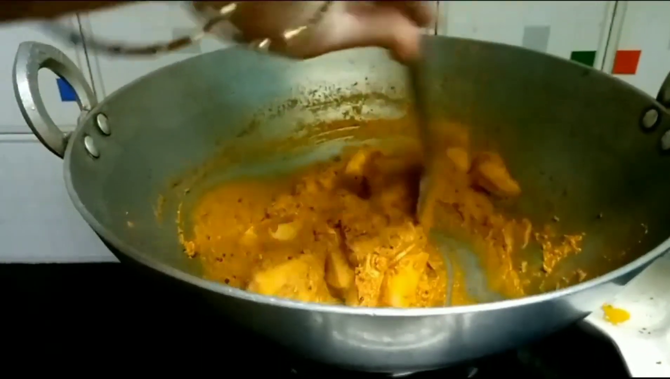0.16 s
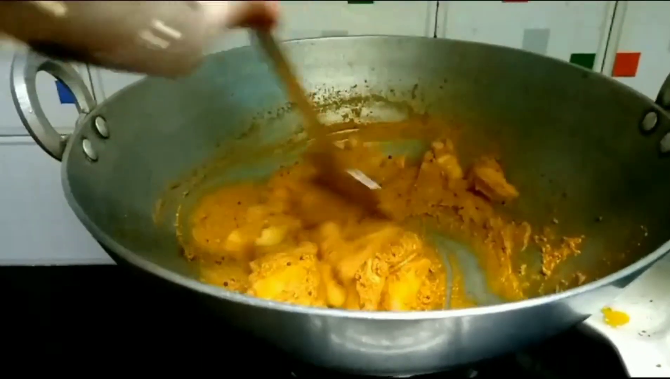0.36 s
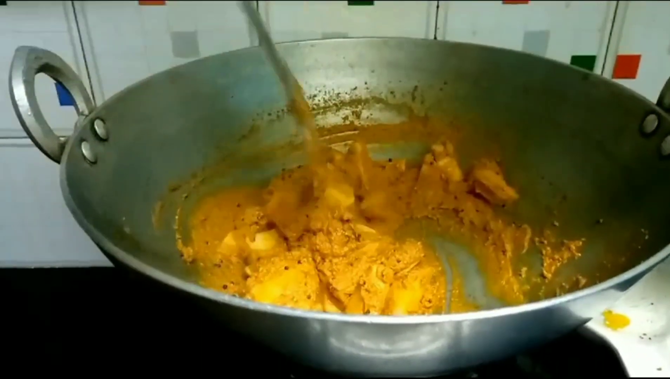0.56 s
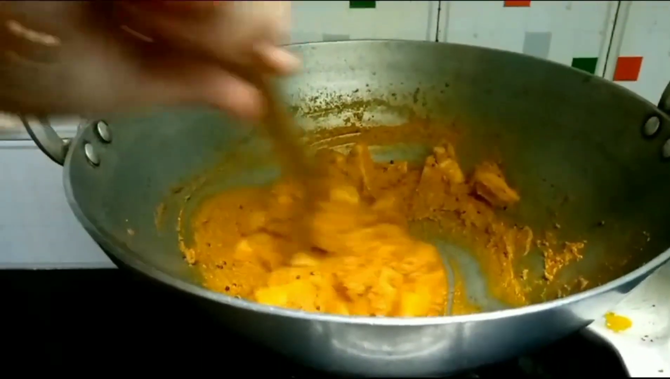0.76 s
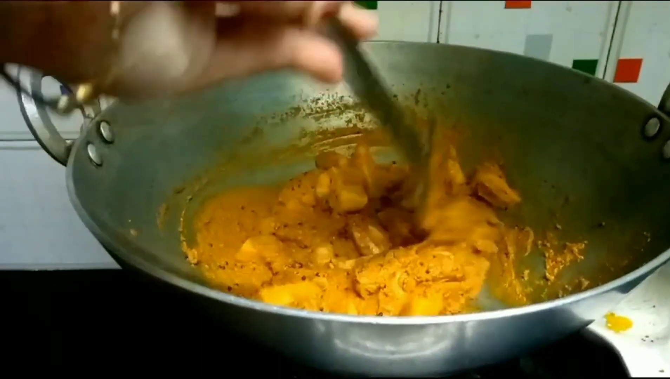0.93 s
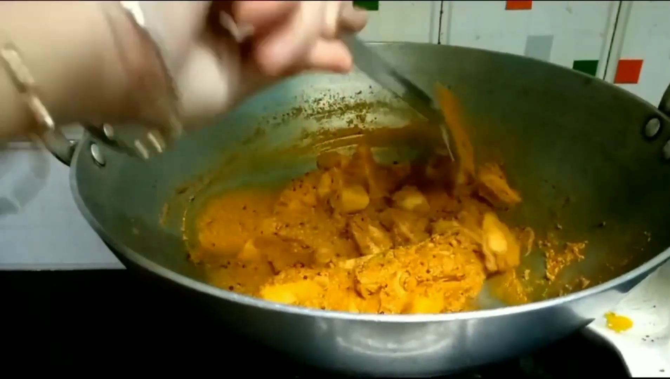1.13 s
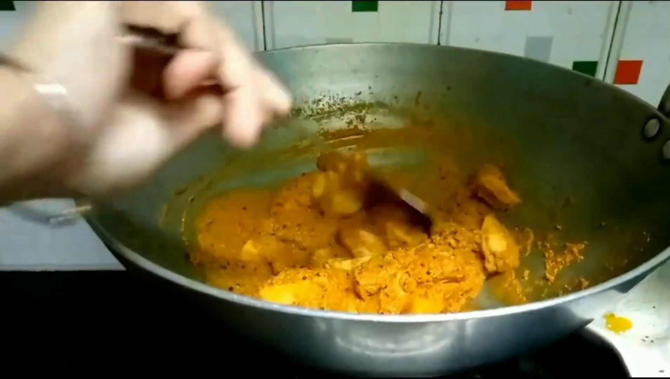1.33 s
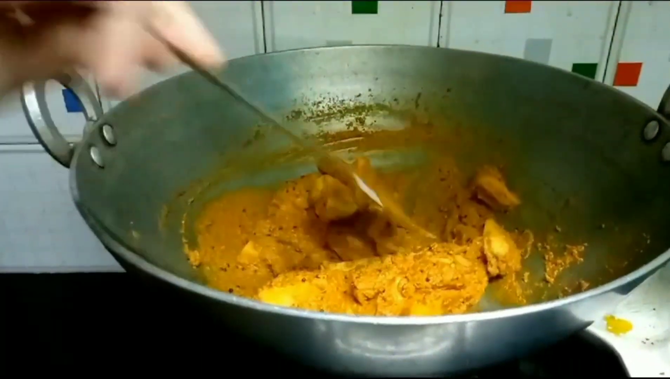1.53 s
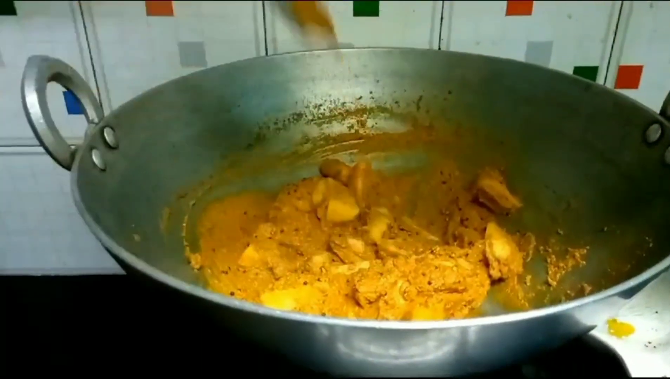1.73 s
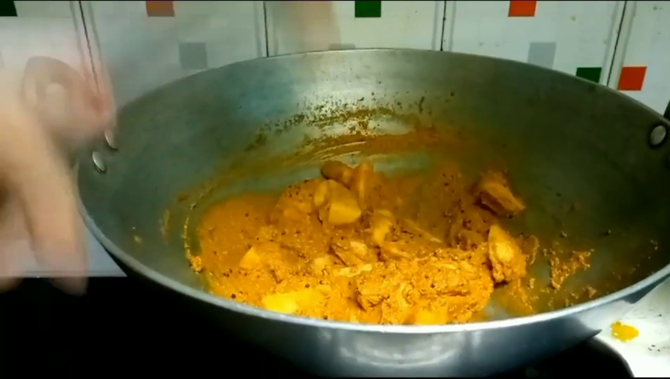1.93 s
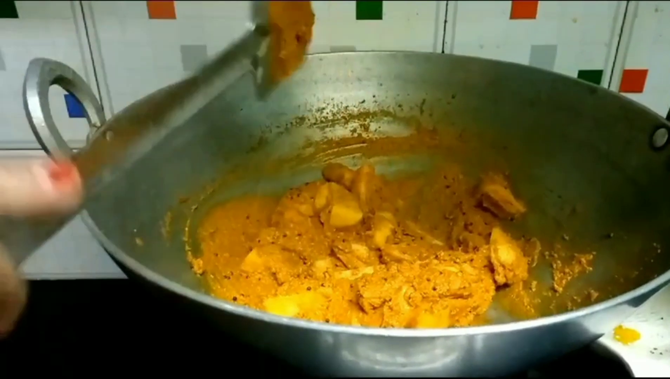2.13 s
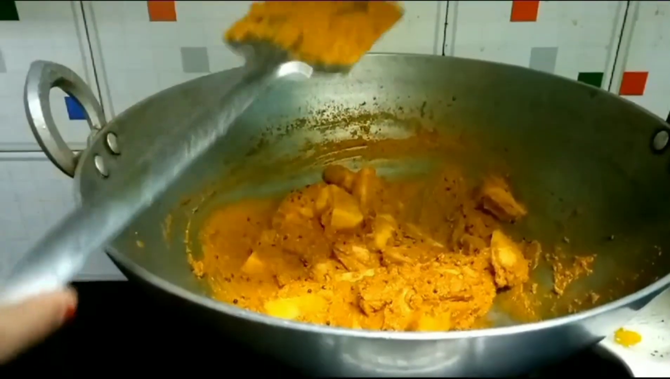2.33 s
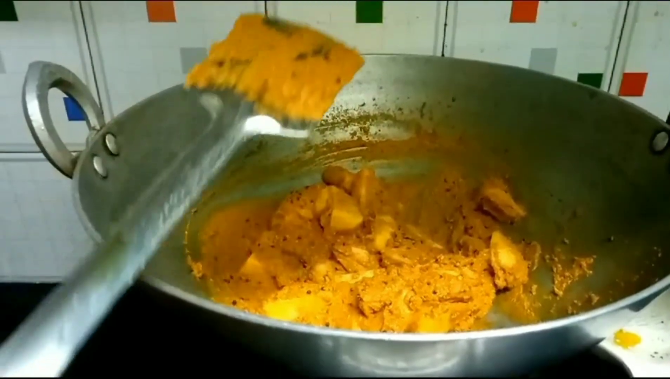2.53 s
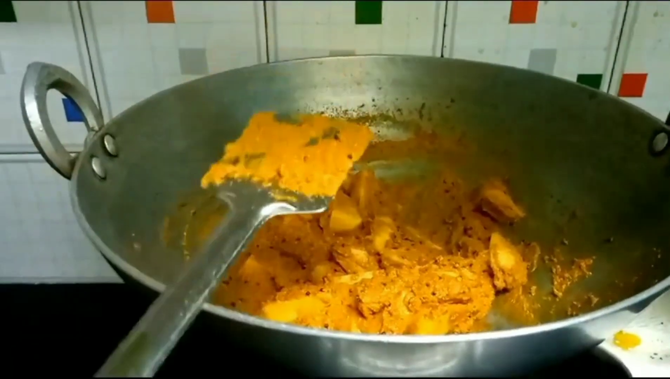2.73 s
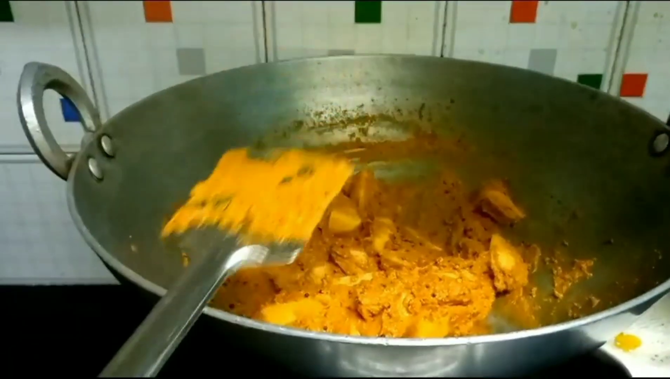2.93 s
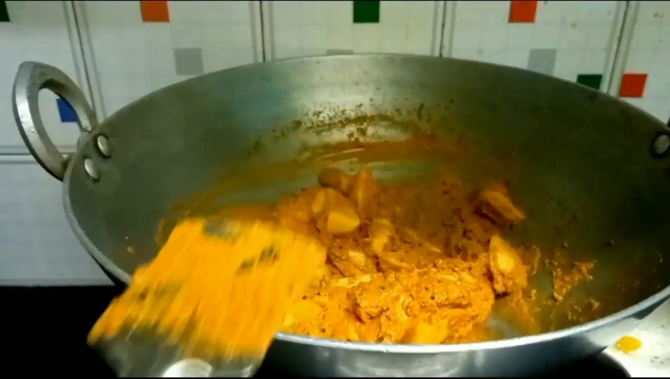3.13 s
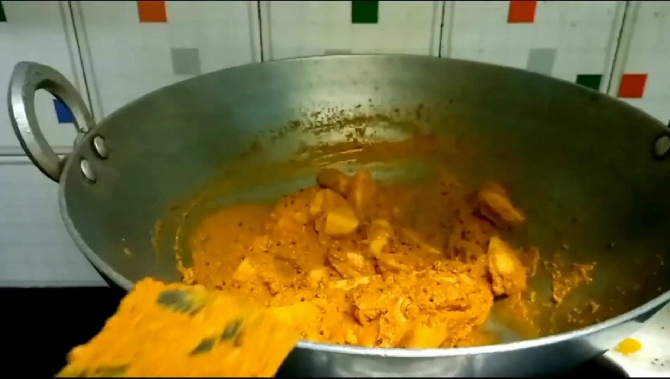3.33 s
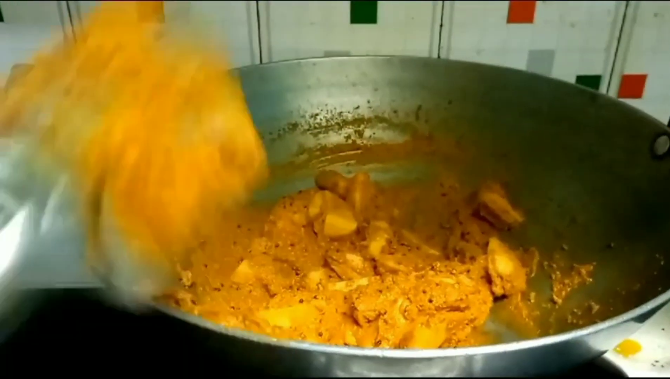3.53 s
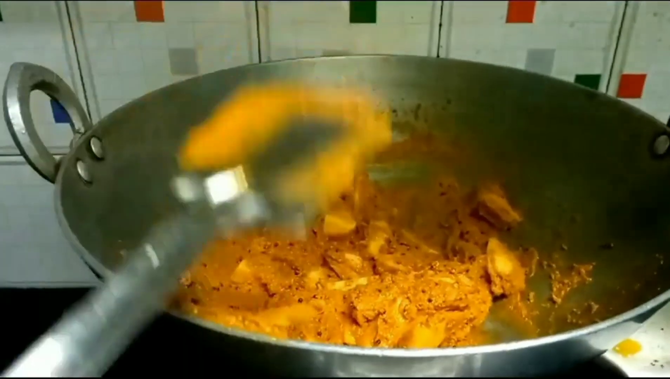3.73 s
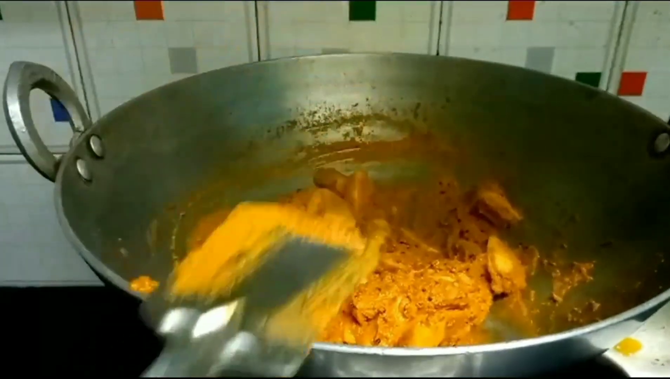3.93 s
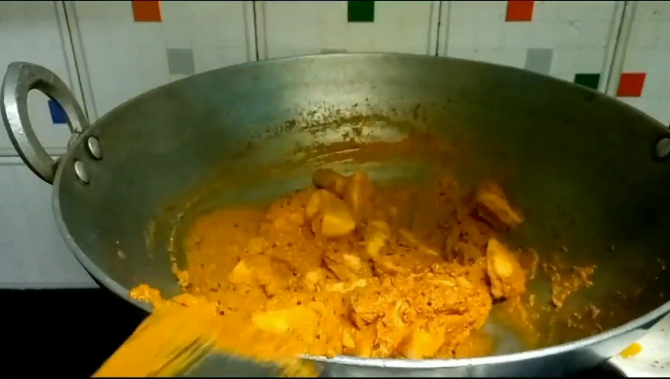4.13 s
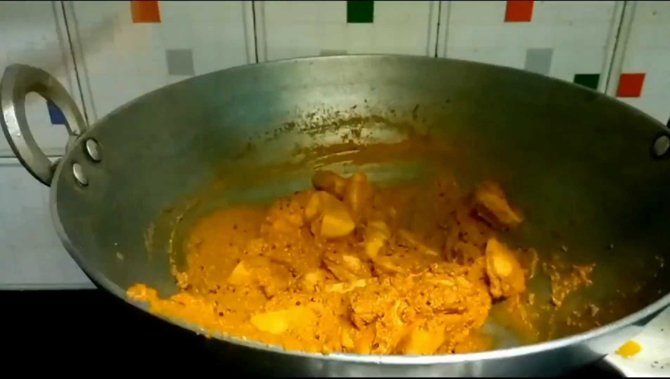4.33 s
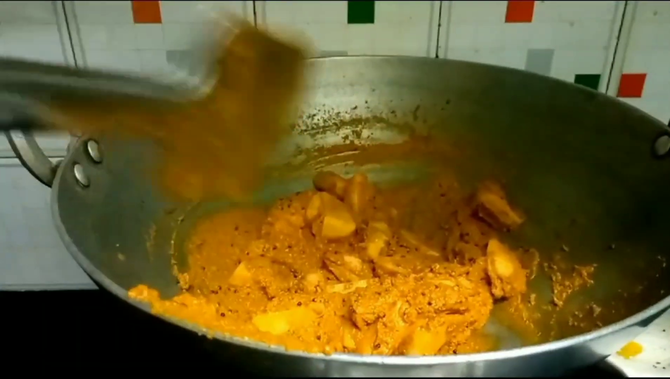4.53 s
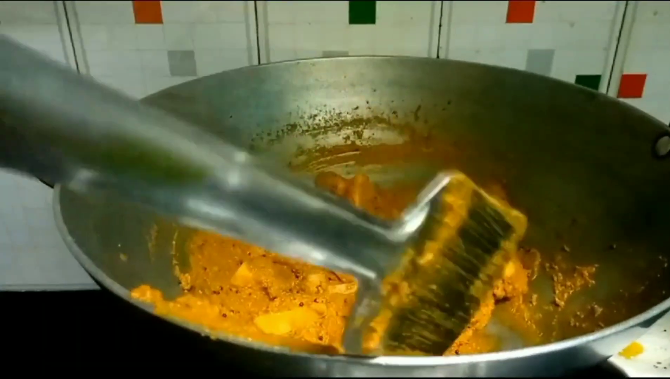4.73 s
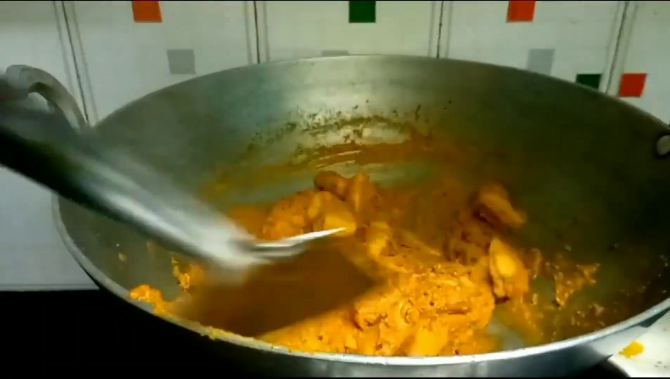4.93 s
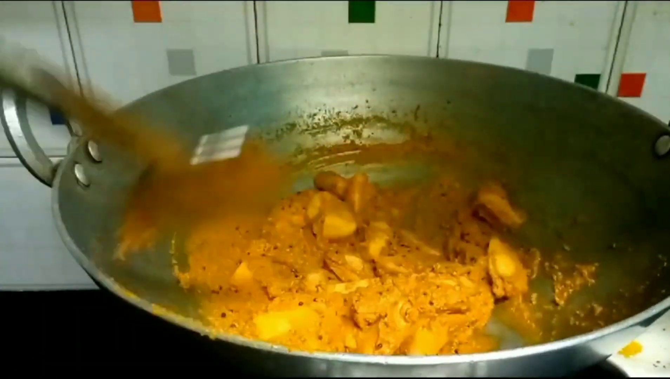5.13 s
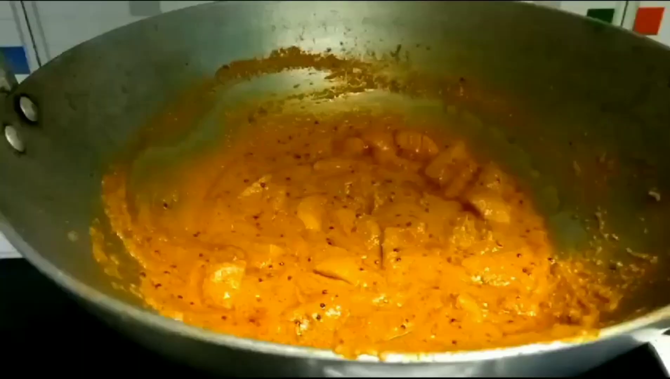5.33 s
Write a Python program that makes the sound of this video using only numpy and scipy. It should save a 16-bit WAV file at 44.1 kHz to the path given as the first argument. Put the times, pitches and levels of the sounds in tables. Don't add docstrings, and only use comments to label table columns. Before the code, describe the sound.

A small, hard-surfaced kitchen heard closely in stereo, with a soft low burner drone and bassy moving air throughout. From 0 to 0.3 s a metal spatula scrapes and shoves thick paste, with several dull, damped pan knocks. A muted scrape comes near 0.8 s; otherwise, until about 2.2 s, there are only sparse bangle ticks and tiny wet pops. Light metallic taps start at 2.7 s, clustering with short ringing scrapes around 2.9-3.1 s. Soft thuds and lumpy pushes follow at 3.2-3.45 s, then a bright bangle jingle at 3.5 s. At 3.86 s a hard double blow on the rim clanks loudest, with a short ring. Faint taps and muffled shoves occupy 4.1-4.4 s. Another hard clank at 4.7 s leads into a rough, bright, stuttering scrape, strongest at 4.85-5.0 s. At 5.25 s the sound briefly hushes, then faint, crisp frying hiss continues to the end.

```python
import sys
import numpy as np
from scipy import signal
from scipy.fft import rfft, irfft, next_fast_len
from scipy.io import wavfile
from scipy.ndimage import uniform_filter1d

SR = 44100
rng = np.random.default_rng(int(sys.argv[2]) if len(sys.argv) > 2 else 0)


def gain_from_db(level_db):
    decades = np.asarray(level_db, float) / 20
    return 10 ** decades


def master_out(mix):
    frames = np.transpose(np.atleast_2d(mix))
    ceiling = np.clip(frames, -1, 1)
    pcm = np.round(ceiling * 32767).astype(np.int16)
    wavfile.write(sys.argv[1], SR, pcm)


N = 241315
T = np.arange(N) / SR
HUSH_FROM_S, HUSH_TO_S = 5.252, 5.301


def unit(x):
    return x / np.sqrt(np.mean(x ** 2))


def decay(t, t60_s):
    return 1000 ** (-t / t60_s)


def colour(x, table, share=1):
    size = next_fast_len(x.shape[-1])
    hz, db = np.transpose(table)
    log_hz = np.log(np.arange(size // 2 + 1) * SR / size + 1)
    gain = gain_from_db(share * np.interp(log_hz, np.log(hz), db))
    return irfft(rfft(x, size) * gain, size)[..., :x.shape[-1]]


def low(x, hz):
    return signal.sosfilt(signal.butter(2, hz, fs=SR, output="sos"), x)


def high(x, hz):
    return signal.sosfilt(signal.butter(2, hz, "high", fs=SR, output="sos"), x)


def brighten(x, hz, db):
    top = high(x, hz)
    return x - top + gain_from_db(db) * top


def tone(x, body_db, bright_db):
    return brighten(brighten(x * gain_from_db(body_db), 1600, -body_db), 2870, bright_db)


def resonate(x, peaks):
    out = 0
    for hz, width, db in peaks:
        sharpness = hz / max(width, 5, hz / 70)
        out = out + gain_from_db(db) * signal.lfilter(*signal.iirpeak(hz, sharpness, SR), x)
    return out


def walk(rate):
    return 1.2 * np.interp(T * rate, np.arange(N // 100), rng.standard_normal(N // 100))


def add(out, s, x, db):
    i = int(s * SR)
    out[..., i:i + x.shape[-1]] += gain_from_db(db) * x / np.abs(x).max()


def grit(scatter_db, flutter_db, rate):
    size_db = scatter_db * rng.exponential(size=N) + flutter_db * walk(rate)
    return unit(rng.standard_normal((2, N)) * gain_from_db(size_db))


def strokes(rows, dulling):
    s, db, swell, fade, bright_db = np.transpose(rows)
    pair = np.clip(np.searchsorted(s, T) - np.array([[1], [0]]), 0, len(s) - 1)
    eased_db = 20 * np.maximum((s[pair] - T) / swell[pair], (T - s[pair]) / fade[pair])
    level_db = db[pair] - eased_db
    firmer = np.argmax(level_db, axis=0), np.arange(N)
    bright_db = np.maximum(bright_db[pair] - dulling * eased_db, -30)
    return uniform_filter1d(gain_from_db(level_db)[firmer], size=400), uniform_filter1d(bright_db[firmer], size=400)


# (frequency [Hz], side minus mid [dB])
SIDE_SHARE = [(60, -29), (110, -17), (200, -15.5), (380, -10.5), (700, -4), (1290, 1.5), (2380, 0.5),
              (4400, 0.5), (8120, 0), (15000, -0.5)]


def ports(mid, side):
    side = colour(side, SIDE_SHARE)
    return np.array([mid + side, mid - side])


# (frequency [Hz], width [Hz], level [dB])
DRONE_LINES = [(43.5, 7.4, -9), (100.8, 7, 1), (147.4, 7.8, -10.5), (288.7, 16, -7)]
# (time [s], drone level [dB])
FLAME = [(0.0, -45), (0.32, -57), (0.41, -43), (0.6, -48), (0.8, -54), (1.31, -48), (2.19, -50.5),
         (2.3, -42), (2.42, -47), (2.85, -39), (3.03, -44), (3.7, -42), (3.9, -45), (4.59, -44),
         (4.68, -50), (4.77, -42), (5.21, -44), (5.47, -44)]


def burner():
    hum = rng.standard_normal((2, N))
    drone = 0
    for hz, width, db in DRONE_LINES:
        line = resonate(resonate(hum, [(hz, width, 0)]), [(hz, 2 * width, 0)])
        drone = drone + gain_from_db(db) * unit(line)
    return drone * gain_from_db(np.interp(T, *np.transpose(FLAME)) - 2.2)


# (frequency [Hz], density [dB per Hz])
AIR_COLOUR = [(15, -33.5), (30, -14.5), (60, -10), (130, -4), (220, -10), (420, -10), (600, -18),
              (1100, -26), (1480, -29.5), (2050, -28), (3920, -41), (11900, -46.5), (16000, -55.5)]
# (time [s], level [dB])
FAN = [
    (0.0, -41),
    (0.4, -47.5),
    (1.5, -49),
    (2.4, -48),
    (3.1, -43.5),
    (4.2, -44.5),
    (4.68, -46),
    (4.78, -40),
    (5.2, -48),
    (5.47, -48),
]


def fan():
    draught = unit(colour(rng.standard_normal((2, N)), AIR_COLOUR))
    return draught * gain_from_db(np.interp(T, *np.transpose(FAN)) + .8 * walk(6))


# (frequency [Hz], density [dB per Hz])
DRAG_COLOUR = [(180, -39), (300, -11.5), (842, -12), (1250, -7.5), (1530, -13.5), (2700, -13),
               (3520, -11.5), (8640, -22), (14000, -26), (15200, -37), (16000, -84)]
# (time [s], level [dB], time to fade 20 dB [s], ring [Hz], ring level [dB])
SNAGS = [(0.005, -46, .04, 4000, 8), (0.06, -50, .03, 4500, 10), (2.9387, -50, .12, 2780, 18),
         (2.95, -54, .05, 3500, 17), (2.93, -54, .06, 4850, 14), (3.012, -42, .05, 2480, 15),
         (3.028, -42, .09, 770, 27), (3.069, -38, .04, 2230, 12), (3.095, -50, .1, 3100, 18),
         (4.7877, -38, .05, 2660, 8), (4.8156, -31, .04, 5020, 7), (4.862, -34, .12, 1240, 14),
         (4.8815, -25.5, .022, 5100, 5), (4.9, -32, .04, 2130, 10), (4.914, -25.5, .02, 1400, 8),
         (4.9328, -25, .03, 2780, 7), (4.9598, -23, .022, 8500, 0), (4.964, -33, .06, 2130, 14),
         (4.983, -24.5, .02, 2700, 6), (4.962, -33, .03, 4250, 13), (5.066, -47, .03, 2750, 16)]


def snags(rough):
    rise_s, sharpness = .0015, 24
    out, t = np.zeros((2, N)), T[:SR // 4]
    for s, db, fade, hz, ring_db in SNAGS:
        i = int(s * SR)
        burst = rough[:, i:i + len(t)] * gain_from_db(db - 20 * t / fade) * np.minimum(t / rise_s, 1)
        scratch = gain_from_db(12.5) * high(colour(burst, DRAG_COLOUR), 1000)
        ring = resonate(burst[0], [(hz, hz / sharpness, ring_db + 6)])
        out[:, i:i + len(t)] += scratch + ring
    return out


# (firmest pressure at [s], level [dB], time to swell 20 dB [s], time to fade 20 dB [s], brightness [dB])
DRAGS = [(0.02, -33.5, .3, .15, 2), (0.14, -48, .03, .01, 6), (0.74, -50, .04, .2, 3),
         (0.78, -38.5, .06, .06, -12), (0.85, -57, .06, .1, 2), (2.285, -51, .05, .13, 5),
         (2.862, -38, .004, .06, 0), (2.95, -41, .1, .1, -4), (3.0, -39, .2, .05, -7),
         (3.028, -31, .04, .3, -5.5), (3.072, -30, .3, .058, -10), (3.2, -44, .11, .03, -11),
         (3.37, -52, .08, .035, 0), (4.084, -41, .012, .045, 6), (4.735, -34, .01, .3, -5),
         (4.89, -28, .24, .3, -3), (4.96, -28, .6, .3, -3), (4.995, -26, .2, .05, -5)]
# (frequency [Hz], width [Hz], level [dB])
OPENING = [(2490, 42, -5), (4110, 130, 0), (4470, 41, 0), (5510, 54, -4), (5840, 31, -5), (8000, 110, -9),
           (8560, 40, -8), (10400, 35, -12), (11700, 44, -12)]
# (frequency [Hz], width [Hz], level [dB])
LIGHT = [(759, 31, 1), (1420, 25, -13), (1914, 51, 3), (2260, 22, 1), (2500, 38, -6), (2614, 29, 5),
         (3140, 24, -3.5), (2780, 35, -3), (3500, 45, -8), (4100, 55, -8), (4550, 60, -8), (5450, 70, -10)]
# (frequency [Hz], width [Hz], level [dB])
FIRM = [(1263, 59, -3.5), (1394, 16, 2), (1700, 78, -5.5), (2130, 40, 3.5), (2720, 110, 4), (3310, 41, -14),
        (4180, 104, -1), (4580, 67, -2.5), (5120, 60, -5), (5580, 74, -15), (754, 35, -18), (6330, 60, -14),
        (7880, 80, -12), (8580, 150, -12), (11200, 200, -14)]


def drags():
    bare_until_s, light_from_s, firm_from_s = .3, 2.5, 4.5
    full_body_at_db, thin_body_db, full_body_db, firm_body_db = -30, -4, 3, 1
    gain, bright_db = strokes(DRAGS, .3)
    eased_db = np.maximum(full_body_at_db - 20 * np.log10(np.abs(gain) + 1e-9), 0)
    light_body_db = np.maximum(full_body_db - 1.1 * eased_db, thin_body_db)
    body_db = np.where(T > firm_from_s, firm_body_db, light_body_db)
    rough = grit(2.3, .9, 110)
    push = rough * gain
    rub = colour(push, DRAG_COLOUR) * gain_from_db(12.5)
    buried, light, firm = np.split(push[0], [int(light_from_s * SR), int(firm_from_s * SR)])
    bare = buried * (T[:len(buried)] < bare_until_s)
    lines = np.concatenate([gain_from_db(3) * resonate(bare, OPENING),
                            gain_from_db(12) * resonate(light, LIGHT),
                            gain_from_db(9) * resonate(firm, FIRM)])
    return tone(rub + lines, body_db, bright_db + 7) + brighten(snags(rough), 2870, 2.5)


# (frequency [Hz], width [Hz], level [dB])
PAN = [(290.7, 32.4, 5), (432, 170, -13), (540, 40, -9), (802, 47, -12.5), (998, 120, -16), (1186, 64, -23),
       (1552, 60, -11.5), (1950, 150, -25.5), (2530, 300, -19), (3120, 370, -26)]
# (time [s], peak level [dB], brightness above 700 Hz [dB])
KNOCKS = [(0.091, -22.5, -6), (0.152, -18, 12), (0.236, -25.5, 3), (0.287, -28.5, -11.5), (1.293, -46, 27),
          (3.188, -24, -12.5), (3.214, -23.5, -8), (3.263, -29, -1), (3.382, -39, -8.5), (3.408, -22, 7.5),
          (3.432, -36, 1.5), (4.196, -24.5, -23), (4.236, -23, 4.5), (4.254, -40, -4.5), (4.341, -27, 4),
          (4.367, -21, 3)]


def knocks():
    out, t = np.zeros(N), T[:SR // 4]
    for s, peak_db, bright_db in KNOCKS:
        rattle = rng.standard_normal(len(t)) * np.exp(-t / 0.0048)
        blow = t / .0001 * np.exp(-t / .0001) + .2 * rattle
        ring = low(resonate(blow, PAN), 2600) + gain_from_db(-47) * low(rattle, 5000)
        add(out, s - .001, brighten(ring, 760, bright_db), peak_db + 1.0)
    return out


# (time [s], peak level [dB], pitch [Hz])
FAINT_TICKS = [(0.1231, -43, 8450), (0.1894, -48, 8480), (0.2824, -48, 13500), (0.3915, -51, 12800),
               (0.5294, -60, 8460), (0.5516, -57, 8990), (0.5744, -61, 8550), (0.7382, -46, 8320),
               (0.7801, -44, 12200), (0.8074, -49, 11800), (0.8889, -52, 7990), (0.9524, -58, 8620),
               (1.0365, -57, 12800), (1.061, -56, 9090), (1.1124, -55, 11900), (1.1344, -59, 8460),
               (1.1444, -54, 12300), (1.1644, -59, 8910), (1.2194, -56, 14500), (1.2444, -53, 9030),
               (1.3894, -52, 8490), (1.4194, -55, 11700), (2.378, -54, 13100)]


def faint_ticks():
    out, t = np.zeros((2, N)), T[:SR // 20]
    for s, peak_db, hz in FAINT_TICKS:
        hiss = rng.standard_normal((2, len(t))) * decay(t, .035)
        add(out, s - .001, resonate(hiss, [(hz, 2500, 0), (hz, 500, 3)]), peak_db - 5)
    return out


# (hardest push at [s], level [dB], time to swell 20 dB [s], time to fade 20 dB [s], brightness [dB])
SHOVES = [
    (0.17, -32.5, .17, .075, -3),
    (0.238, -39, .02, .06, 3),
    (3.22, -33.5, .065, .033, -2.5),
    (3.266, -43, .035, .033, -20),
    (3.418, -36.5, .06, .1, 5),
    (3.44, -36, .1, .044, -18),
    (4.202, -40.5, .04, .2, 1.5),
    (4.272, -34, .2, .09, 0),
    (4.392, -37, .4, .04, -5),
]


def shoves():
    gain, bright_db = strokes(SHOVES, .6)
    lumps = grit(2.0, 2.5, 45)[0] * gain
    return brighten(low(resonate(lumps, PAN), 2700) * gain_from_db(21), 700, bright_db + 2.5)


# (time [s], peak level [dB], low ring [Hz], high ring [Hz], high ring level [dB])
JINGLES = [(0.2292, -41.5, 5420, 13400, -13), (0.2664, -47, 4600, 9700, -12),
           (0.454, -45.5, 9000, 10850, -2), (0.7263, -49, 5330, 10200, -2), (0.846, -36.5, 5300, 7000, -8),
           (1.0945, -48, 4900, 8600, -4), (1.2521, -48, 4680, 11500, -14), (1.8846, -43, 5320, 12200, 0),
           (1.9097, -43, 6470, 12200, 4), (2.2834, -37.5, 6270, 11500, 3.5),
           (3.5168, -32.5, 5780, 13030, 9.5), (4.15, -40.5, 7800, 10600, -6), (4.2356, -49, 4800, 9400, 2)]
# (time [s], peak level [dB], low ring [Hz])
TICKS = [(0.325, -53, 4600), (0.415, -55, 8500), (0.7018, -53, 5240), (0.9787, -54, 9430),
         (1.1926, -49.5, 4490), (1.328, -55, 4300), (1.4077, -49, 8900), (1.5279, -53, 8900),
         (1.594, -50.5, 8700), (1.7479, -56, 8440), (1.7848, -51.5, 9000), (2.1196, -53, 5120),
         (2.149, -53.5, 8970), (2.235, -54, 5270), (2.5157, -53, 5760), (2.6294, -59, 4710),
         (3.7594, -58, 4400), (4.427, -53, 9020)]


def bangles():
    out, t = np.zeros((2, N)), T[:SR // 4]
    touches = [(*row, 11500, -4) for row in TICKS]
    for s, peak_db, low_hz, high_hz, high_db in JINGLES + touches:
        hz = np.array([[low_hz], [1.09 * low_hz], [high_hz], [.92 * high_hz]])
        db = np.array([[0], [-4], [high_db], [high_db - 2.5]])
        ring = (gain_from_db(db) * np.sin(2 * np.pi * hz * t)).sum(axis=0) * decay(t, .018)
        noise = rng.standard_normal((2, len(t)))
        rattle = unit(resonate(noise, [(low_hz, 1300, 0), (high_hz, 2600, high_db)]))
        rattle = rattle * decay(t, .047) * np.minimum(t / .002, 1) * gain_from_db(2)
        add(out, s - .001, ring + rattle, peak_db + 1.5)
    return out


# (frequency [Hz], level [dB], t60 [s])
SPATULA = [(378, -25, 0.18), (476.5, -6.5, 0.16), (574, -6, .17), (760, -13, 0.16), (890, -12.5, 0.14),
           (1112, -26, 0.18), (1310, -11, 0.1), (1427, -4.5, 0.1), (1620, -15, 0.13), (1847, -9, 0.23),
           (2120, -15, .14), (2226, -15, 0.11), (2496, -7, 0.15), (2640, 3, 0.1), (2790, -4.5, .14),
           (2900, -6, 0.14), (3142, -5, 0.18), (3290, -2, 0.14), (4460, -7, .1), (4545, 4, 0.06),
           (5100, -21.5, 0.073), (4750, -22.5, .08), (5640, -13, 0.033), (5800, -31, .08),
           (6500, -16, 0.05), (7800, -42, .08), (8800, -11, .08), (8463, 0, .05), (10000, -9, .08),
           (11600, -6, .04)]
# (frequency [Hz], level [dB], t60 [s])
TIP = [(764, -6, 0.2), (1093, -10, 0.12), (1420, -10, 0.2), (1905, -13, 0.15), (2121, -8, 0.2),
       (2245, 0.5, 0.29), (2450, -26, 0.058), (2745, -6, 0.15), (3144, -4.5, 0.28), (3850, -2.5, 0.15),
       (4474, -9, .1), (4900, -35, 0.047), (5469, -8, 0.1), (6550, -35, 0.04), (7800, -24, .06),
       (8900, -4, 0.04)]
# (frequency [Hz], density [dB per Hz])
CRACK = [(180, -50), (300, 0), (1390, -14.5), (1530, -20), (2170, 3), (2360, -7), (2610, 1), (3580, -17.5),
         (4590, -4.5), (5900, -21), (8500, -22), (11500, -32), (16000, -36)]
# (frequency [Hz], level [dB])
NOTCH = [(3300, -0.5), (3650, -6), (4000, 0)]
# (time [s], peak level [dB], brightness above 2.9 kHz [dB], ring length factor, body below 1.6 kHz
# [dB])
CLINKS = [
    (2.7166, -27, 5, .85, 3),
    (2.8633, -31.5, 6, 1, 8),
    (3.0065, -29, -6, 1, 14),
    (3.0255, -21.5, 3.5, 0.85, 0),
    (3.0714, -21, -2.5, 0.68, 3),
    (3.8595, -11, 2.5, 0.64, -0.5),
    (3.8626, -6, -2, 0.9, -1),
    (4.0776, -28.5, 3, 0.5, 5),
    (4.1964, -31, -5, 0.51, 4),
    (4.7132, -13.5, 1, 0.66, 5),
]


def clinks():
    out, t = np.zeros((2, N)), T[:SR // 2]
    for s, peak_db, bright_db, ring, body_db in CLINKS:
        hard = peak_db > -14
        hz, db, t60 = np.transpose(SPATULA if hard else TIP)[:, :, None]
        level, split = rng.standard_normal((2, len(hz), 1))
        one = np.sin(2 * np.pi * hz * t)
        two = .8 * np.sin(2 * np.pi * hz * (1 + .02 * split) * t)
        fade = gain_from_db(db + 1.5 * level) * decay(t, t60 * ring)
        modes = np.array([fade * (one + two), fade * (one - two)]).sum(axis=1)
        crack = unit(colour(rng.standard_normal((2, len(t))), CRACK, 0.54)) * decay(t, .14 * ring)
        struck = colour(modes + gain_from_db(6.5) * crack, NOTCH, 1.5 * hard)
        contact = np.minimum(t / 0.001, 1)
        add(out, s - .001, tone(high(contact * struck, 350), body_db, bright_db), peak_db + 3.5)
    return out


# (frequency [Hz], density [dB per Hz])
FRY = [(590, -42), (1000, -13), (1320, -18), (2030, -11.5), (4730, -17), (5250, -13.5), (7530, -6),
       (9600, -8), (11200, -3), (12300, 4), (13200, -2), (15000, -4), (16000, -10)]


def frying():
    spit = rng.standard_normal((2, N)) * gain_from_db(.7 * walk(90))
    onset = np.clip((T - HUSH_TO_S) / .018, 0, 1) ** 2
    return unit(colour(spit, FRY)) * gain_from_db(-45) * onset


# (frequency [Hz], t60 [s])
ROOM = [(300, 0.33), (1500, 0.38), (5000, 0.36), (14000, 0.3)]
# (frequency [Hz], left minus right [dB])
TILT = [(60, 10), (110, 1.0), (200, -9), (380, -1), (700, -3), (1290, -0.5), (2380, -7), (4400, 0.5),
        (8120, -6), (15000, -2)]


def kitchen(x):
    bowl_db, bowl_t60_s, room_db = 0, 0.011, -6.5
    t = T[:SR // 2]
    early = rng.standard_normal((2, len(t))) * decay(t, bowl_t60_s)
    hz, t60 = np.transpose(ROOM)
    late = 0
    for centre in 125 * 2. ** np.arange(8):
        edges = [centre / 1.41, min(centre * 1.41, 20000)]
        band = signal.butter(1, edges, "band", fs=SR, output="sos")
        fade = decay(t, np.interp(np.log(centre), np.log(hz), t60)) * np.minimum(t / 0.0063, 1)
        late = late + signal.sosfilt(band, rng.standard_normal((2, len(t)))) * fade
    response = (gain_from_db(bowl_db) * unit(high(early, 900)) + gain_from_db(room_db) * unit(late)) / np.sqrt(len(t))
    response[:, 0] += 1
    bins = rfft(np.roll(response, 512, axis=1))
    smooth = np.sqrt(uniform_filter1d(np.abs(bins) ** 2, size=200))
    response = irfft(bins / smooth)[:, 512:]
    heard = ports(*signal.fftconvolve(colour(x, NOTCH), response, axes=1)[:, :N])
    return np.array([colour(heard[0], TILT, .5), colour(heard[1], TILT, -.5)])


def scene():
    metal = clinks() + drags() + knocks() + shoves() + bangles()
    return kitchen(metal) + ports(*(burner() + fan() + frying())) + ports(*faint_ticks())


def roll_off(x):
    return signal.sosfilt(signal.butter(12, 16850, fs=SR, output="sos"), x)


def record(dry):
    hush = uniform_filter1d(1. * ((T > HUSH_FROM_S) & (T < HUSH_TO_S)), size=200)
    bass = signal.sosfiltfilt(signal.butter(2, 1700, fs=SR, output="sos"), dry)
    x = bass * gain_from_db(-11 * hush) + (dry - bass) * gain_from_db(-40 * hush)
    x = signal.sosfilt(signal.ellip(8, .2, 50, 15750, fs=SR, output="sos"), np.tanh(x))
    return roll_off(x)


dry = scene()
out = record(dry)
master_out(out)
```